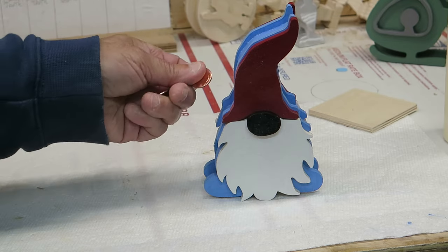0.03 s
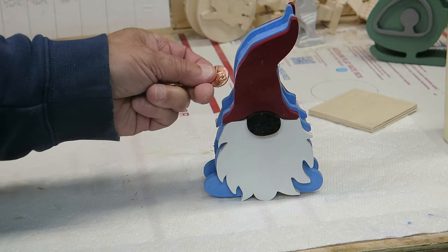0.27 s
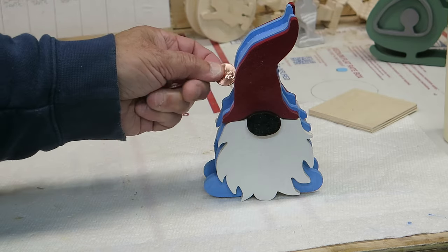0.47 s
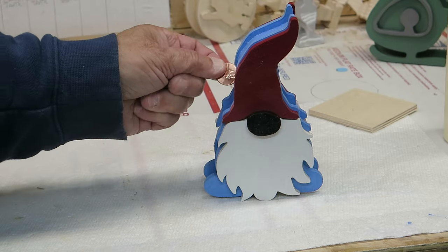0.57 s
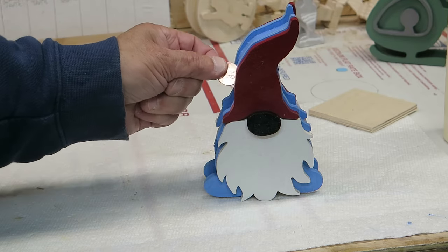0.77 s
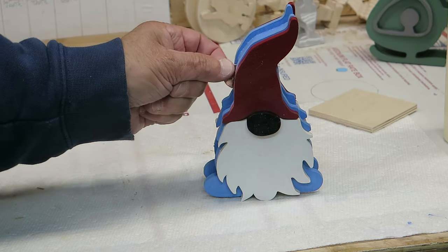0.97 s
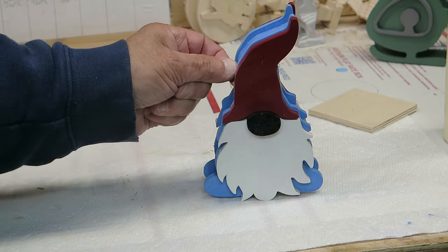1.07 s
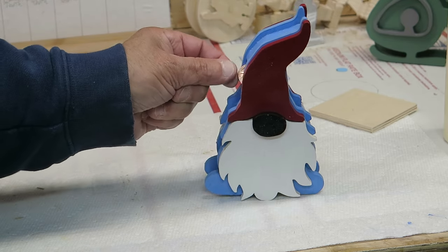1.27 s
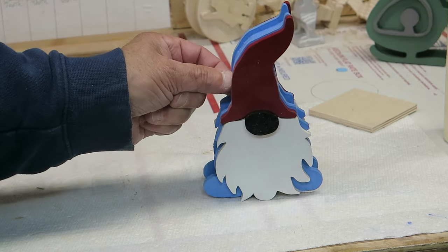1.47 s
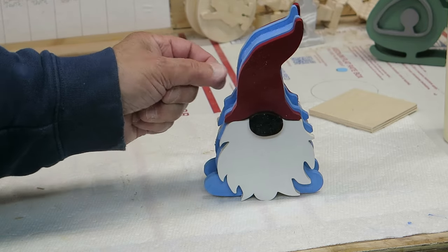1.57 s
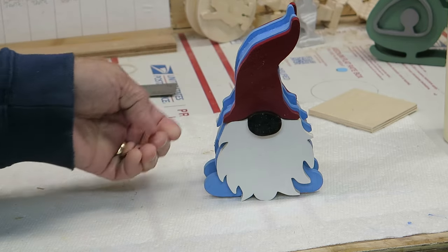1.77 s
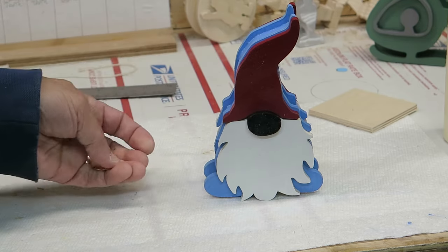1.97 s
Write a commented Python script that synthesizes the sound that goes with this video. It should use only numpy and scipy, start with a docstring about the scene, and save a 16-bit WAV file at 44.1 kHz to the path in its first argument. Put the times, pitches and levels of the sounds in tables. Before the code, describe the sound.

A coin dropped into a hollow wooden bank: steady hiss first, then one loud sharp clack, a quick cluster of lighter clicks and a tiny skitter, close microphone in a small quiet room.

```python
"""A penny drops into a hollow wooden bank: one sharp clack, light bounces, a dull knock and a fine skitter.
Decaying sine modes give the ring of bank and penny; short coloured noise bursts give the crack and ticks.
A small room answers with a brief noise tail, over steady hiss. The clack overloads the recorder, whose gain
control ducks the hiss and slowly recovers. A faint rustle and a light tap follow as the hand draws back."""
import sys
import numpy as np
from scipy import signal
from scipy.fft import rfft, irfft
from scipy.io import wavfile
from scipy.ndimage import uniform_filter1d, minimum_filter1d

SR = 44100
rng = np.random.default_rng(int(sys.argv[2]) if len(sys.argv) > 2 else 0)


def unload_audio(sound):
    """Save the sound as a 16-bit wav file, at the path given as the first command line argument."""
    columns = np.transpose(np.atleast_2d(sound))
    # keep every value between -1 and 1, then stretch to whole-number steps
    steps = np.round(np.clip(columns, -1, 1) * 32767)
    wavfile.write(sys.argv[1], SR, steps.astype(np.int16))


N = 88596  # length [samples]

# All table levels are relative to the gains applied where the sounds are mixed.
# colour of the steady hiss: (frequency [Hz], density [dB per Hz])
HISS_COLOUR = [(18, -30), (30, -11), (114, -1), (220, -3.5), (370, -5.5), (700, -6.5), (1100, -7.5),
               (1700, -8.5), (2400, -9.5), (3300, -10), (4500, -12.5), (6000, -14.3), (8000, -17),
               (11000, -20), (15700, -28.5)]
# left-right likeness of the hiss: (frequency [Hz], correlation [-1 to 1])
HISS_LIKENESS = [(30, .7), (60, .16), (130, -0.3), (290, -0.78), (640, -0.49), (1410, 0.3), (3100, 0.58),
                 (6820, 0.47), (15000, .18)]
# modes of the bank struck by the penny: (frequency [Hz], level [dB], t60 [s])
BANK_MODES = [(760, -25, .011), (1950, -21, .008), (2640, -3, .006), (3490, -10, .009), (4280, -16, .02),
              (5050, -16, .024), (5290, -5, .012), (6450, -16, .022), (7030, -12, .018), (7235, -6, .024),
              (7670, -19, .027), (8780, -8, .014), (9330, -10, .023), (9640, -12, .017), (10030, -14, .017),
              (10350, -11, .01), (11400, -19, .015)]
# colour of the landing crack: (frequency [Hz], level [dB])
CRACK_COLOUR = [(60, -30), (300, -18), (520, -29), (750, -9.5), (1200, -11), (2500, -9), (7000, -4),
                (11000, -0.5), (13000, -13), (16000, -17)]
# how the room dies away: (frequency [Hz], t60 [s])
ROOM_T60 = [(300, 0.3), (3000, 0.27), (8000, 0.21), (15000, 0.3)]
# how strongly the room answers: (frequency [Hz], level [dB])
ROOM_COLOUR = [(300, -14), (1500, -22.5), (3000, -11), (7000, -10), (14000, -18)]
# contacts of the bouncing penny: (time [s], tick [dB], treble tilt [dB per TILT_HZ], ring [dB], chime [dB])
CONTACTS = [(1.5930, 0.5, -9, -9.5, -55), (1.6437, -12.5, -1, -15, -60), (1.6472, -18.5, 7, -17.5, -58),
            (1.6713, -22, -20, -29, -70), (1.6898, -15, -6, -37, -48), (1.6932, -10, -3, -20, -42),
            (1.6955, -7, -1, -24, -36), (1.6976, -9, 11, -9.5, -37), (1.7009, -5, 0, -13, -26),
            (1.7509, -20, -15, -29, -50), (1.7536, -14, -9, -17, -36), (1.7553, -14, 3, -23, -40)]
# colour of the tick at each contact: (frequency [Hz], level [dB])
TICK_COLOUR = [(200, -38), (1400, -38), (2400, -3.5), (4000, -5.5), (7200, 3), (9500, 7), (12000, -7),
               (16000, -17)]
# modes of the penny and the wood under it: (frequency [Hz], level [dB], t60 [s])
PENNY_MODES = [(2270, -19, .022), (2970, -12, .028), (4930, -10, .04), (5200, -14, .04), (5750, -15, .028),
               (6220, -14, .04), (6520, -10, .03), (6900, -8, .032), (7230, -6, .035), (8430, -9, .035),
               (8810, -5, .026), (9080, -11, .05), (9350, -6, .05), (10700, -10, .028)]
# modes of the penny struck on the rim: (frequency [Hz], level [dB], t60 [s])
CHIME_MODES = [(12600, 4.5, 0.068), (13400, -3, .04)]
# modes of a dull knock on the wooden wall: (frequency [Hz], level [dB], t60 [s])
KNOCK_MODES = [(696, -32, 0.014), (1250, -29, 0.006)]
# loudness of the penny skittering to rest: (time [s], level [dB])
SKITTER_LEVEL = [(1.760, -38), (1.778, -33), (1.791, -39), (1.803, -51)]
# colour of the skitter: (frequency [Hz], level [dB])
SKITTER_TONE = [(200, -23), (1500, -15), (2700, -4), (4000, -7), (5100, 1), (6200, -11), (7300, -3.5),
                (10000, -7), (13000, -3), (16000, -18)]
# loudness of the hand's rustle: (time [s], level [dB])
RUSTLE_LEVEL = [(1.955, -69), (1.983, -45), (2.009, -41.5)]
# colour of the rustle: (frequency [Hz], level [dB])
RUSTLE_TONE = [(100, -0.5), (600, 2), (1500, -10), (3500, 0), (5000, -13), (15000, -20)]
# modes of the hand's light tap: (frequency [Hz], level [dB], t60 [s])
TAP_MODES = [(480, -40, 0.028), (3470, -32.5, .06)]

HISS_DB = -49
LANDING_S, LANDING_DB = 1.5889, 13.5
CRACK_DB, CRACK_T60_S, TICK_T60_S = -7.5, 0.012, 0.0091  # crack level is relative to the landing
BUILD_S, RISE_S = 0.0009, 0.00015  # modes start one by one within BUILD_S; RISE_S softens each onset
MIC_DELAY_S = 0.000011  # greatest time difference between the two microphones
BURST_LIKENESS = 0.82  # left-right correlation of crack and ticks
TILT_HZ, STRIKE_SPREAD_DB = 9000, 1.6  # treble tilt span; each contact favours other modes
KNOCK_S, TAP_S = 1.7068, 2.002
SKITTER_PER_S, SKITTER_T60_S = 2500, 0.012
LEFT_DB = 0.6  # direct sound: left up, right down by this much
ROOM_DELAY_S = 0.0032
NEAR_DB, NEAR_T60_S = 0, 0.035  # early echoes from the bench, relative to the room tail
SEND_RING_DB, SEND_CRACK_DB, SEND_BOUNCE_DB = -8, 5.5, 3.5  # sends into the room
THRESHOLD_DB, MAX_CUT_DB, RECOVER_DB_PER_S = -17, 11.5, 9.5  # gain control
CEILING = 1.15  # limiter ceiling [1 = full scale]
EDGE_HZ = 15850  # upper band edge


def amp(db):
    """Turns decibels into linear gain."""
    return 10 ** (np.asarray(db) / 20)


def read(points, hz):
    """Reads a table between its points on a log-frequency axis."""
    f, value = np.transpose(points)
    return np.interp(np.log(hz + 1), np.log(f + 1), value)


def add(mix, s, sound):
    """Mixes a stereo sound in at time s, trimmed at the end of the mix."""
    part = mix[:, round(s * SR):][:, :sound.shape[1]]
    part += sound[:, :part.shape[1]]


def noise(colour, likeness, size):
    """Coloured stereo noise, centre rms 1; the side signal widens as left-right likeness falls."""
    hz = np.fft.rfftfreq(size, 1 / SR)
    mid, side = rfft(rng.standard_normal((2, size))) * amp(read(colour, hz))
    correlation = np.clip(read(likeness, hz), -.85, .99)
    side = side * np.sqrt((1 - correlation) / (1 + correlation))
    return irfft([mid + side, mid - side], size) / irfft(mid, size).std()


def hiss():
    """Steady room hiss: stationary noise whose stereo width varies with frequency."""
    return amp(HISS_DB) * noise(HISS_COLOUR, HISS_LIKENESS, N)


def ring(modes, size=8192):
    """Struck modes: decaying sines, each starting a little apart and reaching each microphone in its own phase."""
    out = np.zeros((2, size))
    for hz, db, t60 in modes:
        start = BUILD_S * rng.random()
        t = np.maximum(np.arange(size) / SR - start, 0)
        side = rng.choice([-1, 1]) * np.array([[.5], [-.5]])
        phase = 2 * np.pi * rng.random() + 2 * np.pi * hz * MIC_DELAY_S * side
        envelope = amp(db - 60 * t / t60) * (1 - np.exp(-t / RISE_S))
        out += envelope * np.sin(2 * np.pi * hz * t + phase)
    return out


def burst(colour, t60, tilt_db=0, size=8192):
    """Contact noise scattering inside the hollow bank: fast onset, exponential decay."""
    t = np.arange(size) / SR
    # the tilt pivots at half of TILT_HZ and leaves lower frequencies alone
    tilted = [(hz, db + tilt_db * max(hz / TILT_HZ - .5, 0)) for hz, db in colour]
    envelope = (1 - np.exp(-t / RISE_S)) * amp(-60 * t / t60)
    return noise(tilted, [(1, BURST_LIKENESS)], size) * envelope


def landing():
    """The hard first blow excites bank modes and a broad crack; returns the direct sound and the room send."""
    body, crack = np.zeros((2, 2, N))
    add(body, LANDING_S, amp(LANDING_DB) * ring(BANK_MODES))
    add(crack, LANDING_S, amp(LANDING_DB + CRACK_DB) * burst(CRACK_COLOUR, CRACK_T60_S))
    return body + crack, amp(SEND_RING_DB) * body + amp(SEND_CRACK_DB) * crack


def room(x, size=22050):
    """Convolves with noise that dies at its own rate in each band: early echoes plus a diffuse tail."""
    hz, t, z = signal.stft(rng.standard_normal((2, size)), SR, nperseg=256)
    t60 = read(ROOM_T60, hz)[:, None]
    decay = amp(-60 * t / t60) + amp(NEAR_DB - 60 * t / NEAR_T60_S)
    tail_norm = np.sqrt(2 * np.log(1000) / (t60 * SR))  # evens out tail energy across decay times
    z = z * decay * amp(read(ROOM_COLOUR, hz)[:, None]) * tail_norm
    response = signal.istft(z, SR)[1]
    out = np.zeros((2, N))
    add(out, ROOM_DELAY_S, signal.fftconvolve(x, response, axes=1))
    return out


def bounces():
    """Clusters of light contacts, each a noisy tick, a short ring and a rim chime."""
    out = np.zeros((2, N))
    for s, tick_db, tilt_db, ring_db, chime_db in CONTACTS:
        modes = [(hz, db + STRIKE_SPREAD_DB * rng.standard_normal(), t60) for hz, db, t60 in PENNY_MODES]
        tick = amp(tick_db) * burst(TICK_COLOUR, TICK_T60_S, tilt_db)
        body = amp(ring_db) * ring(modes)
        chime = amp(chime_db) * ring(CHIME_MODES)
        add(out, s, tick + body + chime)
    return out


def knock():
    """A dull knock on the wooden wall: two short low modes."""
    out = np.zeros((2, N))
    add(out, KNOCK_S, ring(KNOCK_MODES))
    return out


def skitter():
    """The penny slides and settles: random small ticks set the power of a coloured noise."""
    s, db = np.transpose(SKITTER_LEVEL)
    ticks = (rng.random(N) < SKITTER_PER_S / SR) * rng.exponential(1, N)
    chatter = signal.lfilter([1], [1, -amp(-60 / (SKITTER_T60_S * SR))], ticks)
    level = amp(np.interp(np.arange(N) / SR, s, db, left=-np.inf, right=-np.inf))
    return level * np.sqrt(chatter / chatter.mean()) * noise(SKITTER_TONE, [(1, 0.8)], N)


def hand():
    """The hand withdraws: swelling rustle noise and a light tap of two modes."""
    s, db = np.transpose(RUSTLE_LEVEL)
    level = amp(np.interp(np.arange(N) / SR, s, db, left=-np.inf))
    out = noise(RUSTLE_TONE, [(1, 0.59)], N) * level
    add(out, TAP_S, ring(TAP_MODES))
    return out


def scene():
    """Mixes penny and bank, their room answer, the hand and the steady hiss."""
    clack, clack_send = landing()
    rattle = bounces() + knock() + skitter()
    direct = (clack + rattle) * amp([[LEFT_DB], [-LEFT_DB]])
    answer = room(clack_send + amp(SEND_BOUNCE_DB) * rattle)
    return direct + answer + hand() + hiss()


def record(dry):
    """Gain control drops at the clack and creeps back; a limiter holds the peaks; then the band limit."""
    power = uniform_filter1d((dry ** 2).mean(0), size=44)
    power_db = 10 * np.log10(abs(power) + 1e-12)
    over_db = np.clip(power_db - THRESHOLD_DB, 0, MAX_CUT_DB)
    # a running maximum on a rising ramp makes the cut recover at a constant rate
    ramp = np.arange(N) / SR * RECOVER_DB_PER_S
    cut_db = np.maximum.accumulate(over_db + ramp) - ramp
    ducked = dry * amp(-uniform_filter1d(cut_db, size=30))
    allowed = CEILING / np.maximum(abs(ducked).max(0), CEILING)
    limited = ducked * uniform_filter1d(minimum_filter1d(allowed, size=13), size=13)
    lowpass = signal.firwin(767, EDGE_HZ, window=("kaiser", 8), fs=SR)
    return signal.oaconvolve(limited, lowpass[None], "same")


dry = scene()
out = record(dry)
unload_audio(out)
```